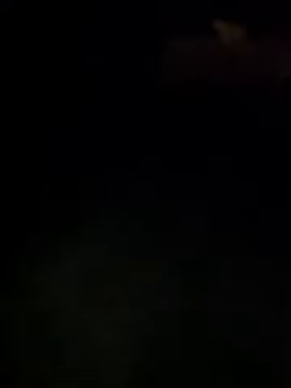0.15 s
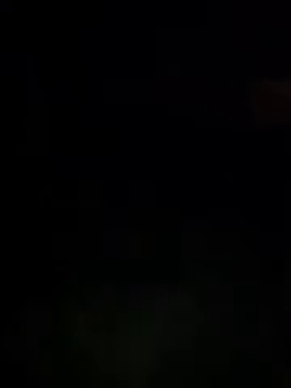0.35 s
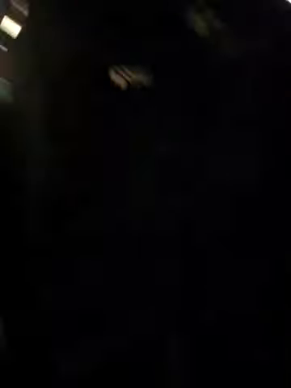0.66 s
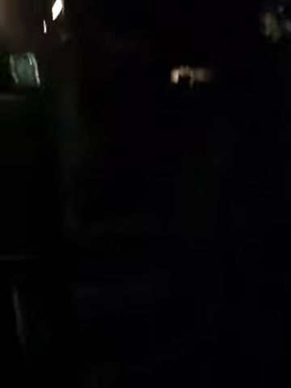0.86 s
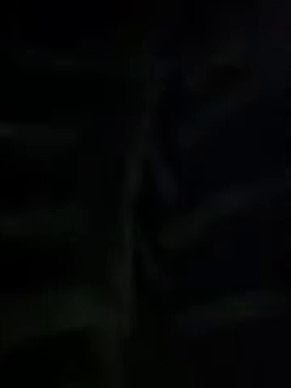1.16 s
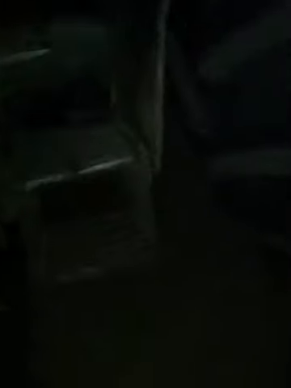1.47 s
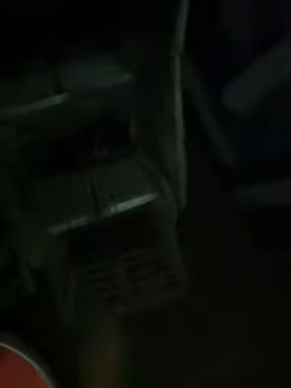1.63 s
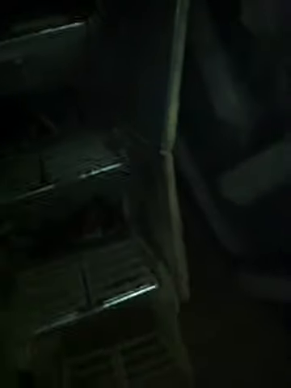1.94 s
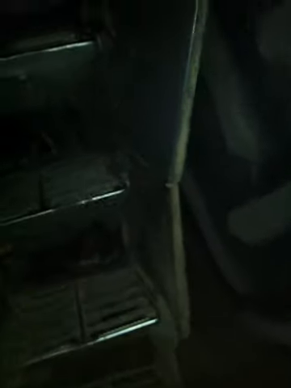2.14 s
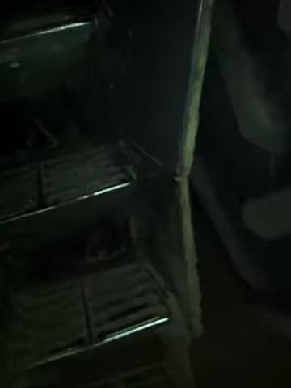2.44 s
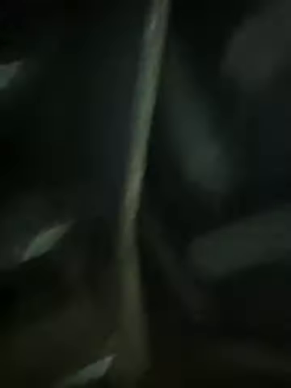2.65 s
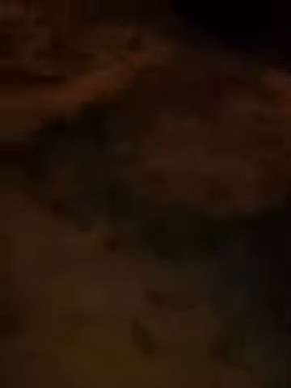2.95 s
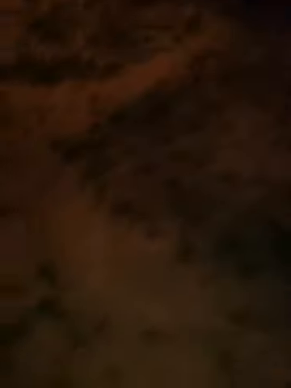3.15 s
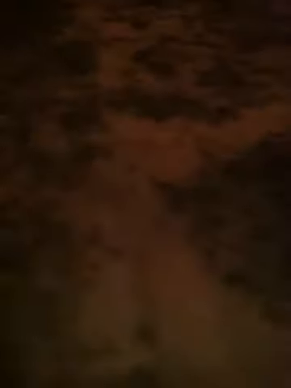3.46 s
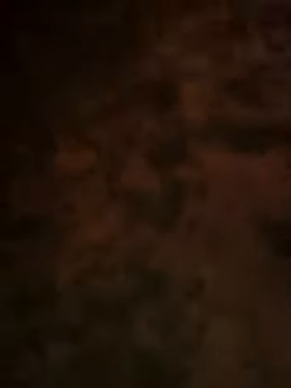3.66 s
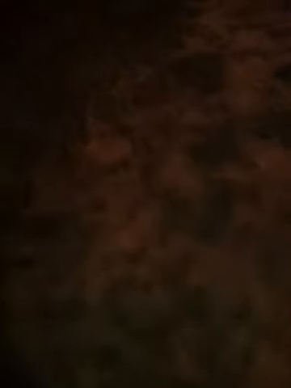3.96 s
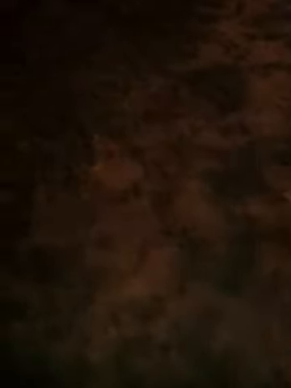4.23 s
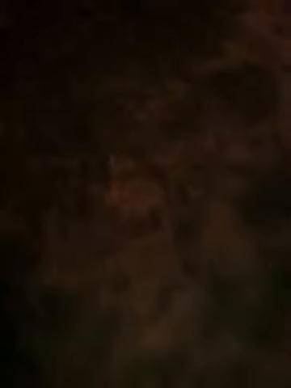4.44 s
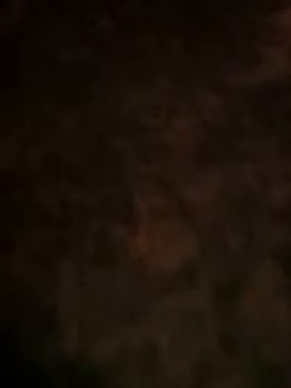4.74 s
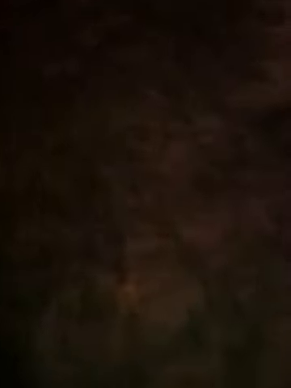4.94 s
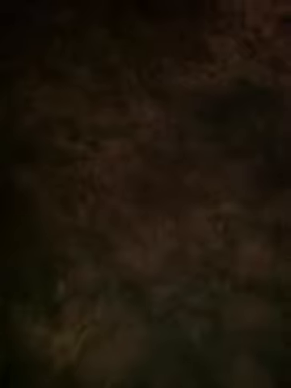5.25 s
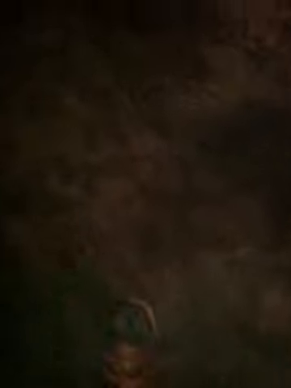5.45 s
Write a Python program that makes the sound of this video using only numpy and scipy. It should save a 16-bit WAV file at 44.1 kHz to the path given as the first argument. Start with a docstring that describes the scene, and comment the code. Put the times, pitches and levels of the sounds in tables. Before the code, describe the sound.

Rough, clattering diesel tractor idle at very close range, a sudden short gap, then the engine returns slightly farther off and speeds up.

```python
"""A six-cylinder diesel tractor idles beside a hand-held microphone, which it overloads; later it speeds up.
Each firing rings the block and sets off injector and valve clatter: noise bursts and dense rings,
coloured by panels and microphone place. The exhaust is three harmonics of the firing rate; the fan a shaken tone.
The sound cuts out for about 0.6 s, then fades in from a little farther off before the engine picks up speed."""
import sys
import numpy as np
from scipy import signal
from scipy.fft import rfft, irfft
from scipy.io import wavfile
from scipy.ndimage import uniform_filter1d, minimum_filter1d

SR = 44100
rng = np.random.default_rng(int(sys.argv[2]) if len(sys.argv) > 2 else 0)


def write(x):
    x = np.atleast_2d(x).T
    wavfile.write(sys.argv[1], SR, np.round(np.clip(x, -1, 1) * 32767).astype(np.int16))


N = 246958
TIME = np.arange(N) / SR

# relative strength of each cylinder, in firing order: (knock [dB], clatter [dB])
CYLINDER_LEVELS = [(0, -4), (0, -2.5), (0, -1.5), (.5, -1.5), (0, -2), (0, -3)]
# microphone place: (time [s], place [0 flank, 1 steps, 2 farther off])
MIC_PLACE = [(0, 0.05), (.5, 0.56), (.85, 1.2), (3.1, 1.05), (3.5, 1.8), (5.6, 2.2)]

IDLE_FIRINGS_HZ, REV_RISE_HZ, REV_MIDDLE_S, REV_EASE_S = 40.135, 11.6, 4.72, .37
BAND_HZ, EDGE_HZ = 8800, 15800  # low-pass before the limiter, and at the very end
STFT_SIZE, STFT_OVERLAP = 2048, 1536


def amp(db):
    """Decibels to gain."""
    return 10 ** (np.asarray(db) / 20)


def evened(x):
    """Scales to rms 1."""
    return x / np.sqrt(np.mean(x ** 2) + 1e-20)


def bell(offset, half_width):
    """Gaussian bump of height 1, down to 1/e at half_width."""
    return np.exp(-(offset / half_width) ** 2)


def resonance(offset_hz, width_hz):
    """Resonance-shaped bump of height 1, half height across width_hz."""
    return 1 / (1 + (2 * offset_hz / width_hz) ** 2)


def curve(rows, t):
    """Reads a (time, value) table at the times t."""
    times, values = np.transpose(rows)
    return np.interp(t, times, values)


def spectrum(points, hz):
    """Gain of a (frequency, dB) table, joined on a log-frequency axis."""
    f, db = np.transpose(points)
    return amp(np.interp(np.log(hz + 1), np.log(f + 1), db))


def wander(rate_hz):
    """Slow random signal of rms 1: noise under a Gaussian low-pass."""
    hz = np.fft.rfftfreq(N, 1 / SR)
    return evened(irfft(rfft(rng.standard_normal(N)) * bell(hz, rate_hz), N))


def low_pass(x, cutoff_hz):
    """Steep linear-phase low-pass."""
    taps = signal.firwin(255, cutoff_hz, window=("kaiser", 8), fs=SR)
    return signal.oaconvolve(x, taps, "same")


def firing_hz(t):
    """Firings per second: a steady idle, then a rise along an S-curve."""
    return IDLE_FIRINGS_HZ + REV_RISE_HZ / (1 + np.exp((REV_MIDDLE_S - t) / REV_EASE_S))


def fan(turns, per_firing, hum_db, waver_db, flutter_rad):
    """Belt-driven blades hum at a fixed ratio to engine speed; turbulence shakes level and phase."""
    # relative hum, loudest beside the steps: (time [s], level [dB])
    fan_levels = [(0, -38), (1.7, -23), (2.85, -20), (3.8, -31.5), (5.6, -33.5)]
    level = amp(curve(fan_levels, TIME) + hum_db + waver_db * wander(23))
    phase = 2 * np.pi * per_firing * turns + flutter_rad * wander(8)
    return level * np.sin(phase)


def exhaust(turns, harmonics_db, pipe_hz, pipe_width_hz, pipe_db):
    """Throb at the firing rate and its overtones, which swell near the pipe's resonance."""
    out = np.zeros(N)
    for k, db in enumerate(harmonics_db, start=1):
        lift_db = pipe_db * resonance(k * firing_hz(TIME) - pipe_hz, pipe_width_hz)
        out += amp(db + lift_db) * np.cos(2 * np.pi * k * turns)
    return out


def passing_db(hz, t, hollow_width_hz, patchy_db, shimmer_db):
    """Colour that changes as the microphone moves: hollow, local resonances, flares, drifting patches."""
    # boom of the hollow between wheel and cab: (time [s], frequency [Hz])
    hollow_pitch = [(0, 318), (.5, 240), (1.5, 327), (2.55, 350), (2.8, 392), (3.8, 345), (5.6, 332)]
    # bodywork resonances: (time [s], half length [s], frequency [Hz], half width [Hz], lift [dB])
    standing = [(.6, .6, 560, 70, 3.5), (2.15, .4, 404, 22, 4.5), (2.25, .7, 1267, 59, 7),
                (4.7, .8, 114.3, 14, 1.5), (4.8, 0.68, 4820, 280, 5.5), (5.45, 0.44, 500, 90, 3.5)]
    # treble bands gliding down as the metalwork passes: (time [s], frequency [Hz], lift [dB])
    flares = [(.744, 5420, 8.5), (1.13, 5350, 1), (1.2, 6430, 11), (1.83, 6700, 8.5), (2.24, 3990, 9.5),
              (2.67, 5170, 8)]
    hollow_db = 5.5
    flare_half_s, flare_half_width_hz, flare_glide_hz_per_s = 0.045, 190, -1500

    f = hz[:, None]
    db = hollow_db * resonance(f - curve(hollow_pitch, t), hollow_width_hz)
    for s, half_s, centre_hz, half_hz, lift_db in standing:
        db = db + lift_db * bell(t - s, half_s) * bell(f - centre_hz, half_hz)
    for s, start_hz, lift_db in flares:
        glide_hz = start_hz + flare_glide_hz_per_s * (t - s)
        db = db + lift_db * bell(t - s, flare_half_s) * bell(f - glide_hz, flare_half_width_hz)

    patches = uniform_filter1d(rng.standard_normal(db.shape), size=22, axis=0)
    patches = uniform_filter1d(patches, size=6, axis=1)
    # short waves shimmer most, close to the steps
    near_steps = bell(curve(MIC_PLACE, t) - 1, 0.78)
    depth_db = patchy_db + shimmer_db * np.minimum(f / BAND_HZ, 1) * near_steps
    return db + depth_db * evened(patches)


def register_db(k, t):
    """Level of body, knock or clatter: set by place, growing with speed, swaying with the hand."""
    # relative idle level at flank, steps, farther off: (body [dB], knock [dB], clatter [dB])
    loudness = [(-13, -14, -22.5), (-9, -12.5, -13.5), (-10.5, -15.5, -21)]
    # body, knock, clatter: (growth [dB per doubling of speed], hand sway [dB rms])
    registers = [(3, .5), (9, 0), (11, 0.33)]
    growth_db, sway_db = registers[k]
    idle_db = np.interp(curve(MIC_PLACE, t), np.arange(len(loudness)), np.array(loudness)[:, k])
    speed_db = growth_db * np.log2(firing_hz(t) / IDLE_FIRINGS_HZ)
    return idle_db + speed_db + sway_db * np.interp(t, TIME, wander(7.1))


def knocks(turns, delay, t60_s, jitter_s, uneven_db):
    """Each cylinder strikes once a cycle and sets off its own dense ring; delay in firing periods."""
    firing = np.arange(int(turns[-1]))
    late, size = rng.standard_normal((len(firing), 2)).T
    strike_s = np.interp(firing + delay, turns, TIME) + jitter_s * late
    at = np.clip(strike_s * SR, 0, N - 1).astype(int)
    ring_t = TIME[:SR // 8]
    out = np.zeros(N)
    for k, (knock_db, _) in enumerate(CYLINDER_LEVELS):
        own = firing % len(CYLINDER_LEVELS) == k
        blows = np.bincount(at[own], amp(knock_db + uneven_db * size[own]), N)
        ring = evened(rng.standard_normal(len(ring_t)) * amp(-60 * ring_t / t60_s))
        out += signal.oaconvolve(blows, ring)[:N]
    return evened(out)


def clatter(turns, delay, decay, scatter, uneven_db):
    """A sharp noise burst each firing; delay, decay and scatter in firing periods."""
    firing = np.arange(-2, int(turns[-1]) + 2)
    late, size = rng.standard_normal((len(firing), 2)).T
    starts = np.sort(firing + delay + scatter * late)
    last = np.searchsorted(starts, turns) - 1
    cylinder_db = np.array(CYLINDER_LEVELS)[firing % len(CYLINDER_LEVELS), 1]
    burst_db = cylinder_db + uneven_db * size
    envelope = amp(burst_db[last]) * np.exp((starts[last] - turns) / decay)
    return evened(envelope * rng.standard_normal(N))


def strokes(turns):
    """Three voices of a firing: exhaust bark, knock of combustion and piston, metallic rattle."""
    bark = knocks(turns, delay=.92, t60_s=0.15, jitter_s=0.00026, uneven_db=1.5)
    knock = knocks(turns, delay=.2, t60_s=0.081, jitter_s=.00006, uneven_db=0.5)
    slap = knocks(turns, delay=.54, t60_s=0.058, jitter_s=.00008, uneven_db=1.0)
    injectors = clatter(turns, delay=.2, decay=.65, scatter=.05, uneven_db=2.2)
    valves = clatter(turns, delay=.42, decay=0.35, scatter=0.2, uneven_db=2.5)
    rush = rng.standard_normal(N)
    return np.array([evened(bark + amp(2) * rush),
                     evened(knock + amp(-0.5) * slap + rush),
                     evened(injectors + amp(-6) * valves + amp(-5.5) * rush)])


def block(turns):
    """Bark, knock and rattle split by frequency, coloured by panels and microphone place."""
    # engine spectrum from each place, relative: (frequency [Hz], density [dB per Hz])
    by_flank = [(30, -7.5), (70, -6.5), (110, 7), (150, -3.5), (330, -2), (650, -13.5), (1050, -17.5),
                (1500, -20), (2500, -17.5), (3300, -26.5), (4500, -20), (5700, -17), (7000, -24),
                (8000, -41)]
    by_steps = [(30, -7), (70, -5.5), (110, 6.5), (150, -8.5), (330, -9), (650, -19.5), (1050, -24),
                (1500, -20), (2500, -21.5), (3300, -26.5), (4500, -18.5), (5700, -21), (7000, -27.5),
                (8000, -48)]
    farther = [(30, -4), (70, -9.5), (110, 9.5), (150, -5.5), (330, -5.5), (650, -14.5), (1050, -15.5),
               (1500, -18.5), (2500, -27), (3300, -33.5), (4500, -32), (5700, -25), (7000, -33),
               (8000, -49)]
    # ringing panels and covers: (frequency [Hz], width [Hz], lift [dB])
    panels = [(232, 35, 2), (530, 90, 1.5), (830, 90, 2.5), (1290, 70, 3), (1820, 150, 2), (2650, 250, 2),
              (4800, 500, 1.5)]
    # brief treble dips: (time [s], half length [s], level [dB])
    dips = [(0.568, 0.12, -4.5), (1.71, 0.087, -5), (2.077, .08, -3), (2.497, 0.095, -4.5)]

    hz, t, (bark, knock, rattle) = signal.stft(strokes(turns), SR, nperseg=STFT_SIZE, noverlap=STFT_OVERLAP)
    middle, treble = (1 / (1 + (edge_hz / (hz[:, None] + 1)) ** 4) for edge_hz in (650, 2800))
    sound = np.sqrt(1 - middle) * bark + np.sqrt(abs(middle - treble)) * knock + np.sqrt(treble) * rattle

    place = curve(MIC_PLACE, t)
    colour = 0
    for k, view in enumerate([by_flank, by_steps, farther]):
        colour = colour + spectrum(view, hz)[:, None] * np.maximum(1 - abs(place - k), 0)
    panels_db = sum(db * resonance(hz - f, width) for f, width, db in panels)
    moving_db = passing_db(hz, t, hollow_width_hz=56, patchy_db=0.9, shimmer_db=1.5)
    colour = colour * amp(panels_db[:, None] + moving_db)

    # level each register (body, knock, clatter), then let it swell and sink with the microphone
    bands_hz = [(90, 700), (700, 3000), (3000, 8000)]
    log_centres = np.log([450, 1500, 4800])
    gain = 0
    for k, (lo, hi) in enumerate(bands_hz):
        power = np.sum(colour[(hz > lo) & (hz < hi)] ** 2, axis=0) / len(hz)
        share = np.interp(np.log(hz + 1), log_centres, np.eye(len(bands_hz))[k])
        gain = gain + share[:, None] * amp(register_db(k, t)) / np.sqrt(power)
    dip_db = sum(db * bell(t - s, half_s) for s, half_s, db in dips)
    gain = gain * amp(treble * dip_db)
    return signal.istft(sound * colour * gain, SR, nperseg=STFT_SIZE, noverlap=STFT_OVERLAP)[1][:N]


def bounce(x, delay_s, sway_s, echo_db):
    """Adds a reflection off the bodywork whose path changes as the hand moves."""
    heard_from = TIME - delay_s - sway_s * wander(1.0)
    return x + amp(echo_db) * np.interp(heard_from, TIME, x)


def scene():
    """Block, exhaust and fan all follow the running count of firings."""
    turns = np.cumsum(firing_hz(TIME)) / SR
    engine = bounce(block(turns), delay_s=0.001615, sway_s=0.00033, echo_db=-16.5)
    engine = engine + exhaust(turns, harmonics_db=[-11.0, -26.5, -24.5],
                              pipe_hz=150, pipe_width_hz=6.7, pipe_db=11.0)
    engine = engine + fan(turns, per_firing=4.39, hum_db=8.5, waver_db=3.5, flutter_rad=0.71)
    nearness_db = np.interp(curve(MIC_PLACE, TIME), np.arange(3), [1, 2.5, -1])
    return (engine * amp(nearness_db))[None]


def fader():
    """Full level, a sudden cut with a dying remnant, silence, then a straight fade in from a low step."""
    cut_s, remnant_s, remnant_gain = 2.942, .07, .07
    resume_s, fade_in_s, resume_gain = 3.591, .25, .17
    remnant = remnant_gain * np.sqrt(np.clip(1 - (TIME - cut_s) / remnant_s, 0, 1))
    fade_in = np.interp(TIME, [resume_s, resume_s + fade_in_s], [resume_gain, 1], left=0)
    return uniform_filter1d(np.where(TIME < cut_s, 1, remnant + fade_in), size=45)


def record(dry, overload=0.74, low_cut_hz=250, rumble_hz=38, ceiling=0.76, fizz_db=-31, give=.17):
    """The boom overloads the microphone and chops the treble; low cut, narrow band, fast limiter, fader."""
    x = dry[0] / (1 + (dry[0] / overload) ** 8) ** (1 / 8)
    x = x + give * (dry[0] - x)  # the overloaded microphone still yields a little
    for order, hz in ((2, low_cut_hz), (6, rumble_hz)):
        x = signal.sosfilt(signal.butter(order, hz, "highpass", fs=SR, output="sos"), x)
    x = signal.sosfilt(signal.butter(6, 7300, fs=SR, output="sos"), x)
    x = low_pass(x, BAND_HZ)
    needed_gain = np.minimum(1, ceiling / (abs(x) + 1e-9))
    gain = uniform_filter1d(minimum_filter1d(needed_gain, size=13), size=9)
    # a faint fizz wherever peaks are held down
    held_down = abs(uniform_filter1d(1 - gain, size=64))
    fizz = amp(fizz_db) * np.sqrt(held_down) * rng.standard_normal(N)
    return low_pass((x * gain + fizz) * fader(), EDGE_HZ)[None]


dry = scene()
out = record(dry)
write(out)
```